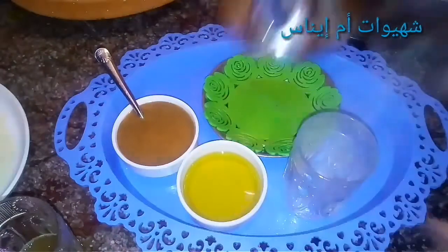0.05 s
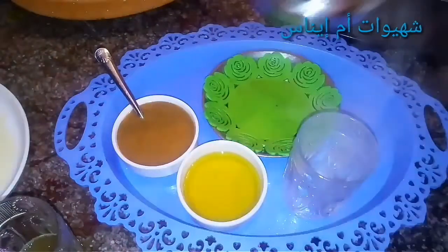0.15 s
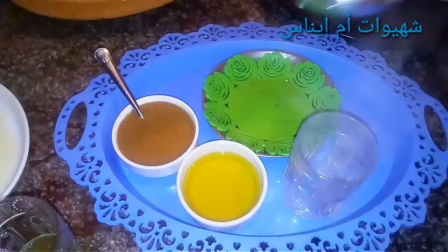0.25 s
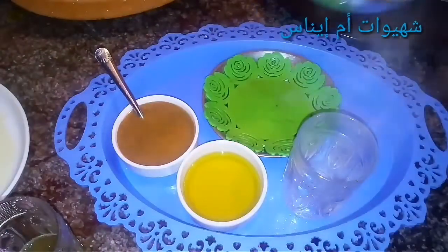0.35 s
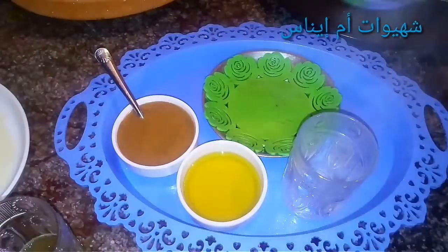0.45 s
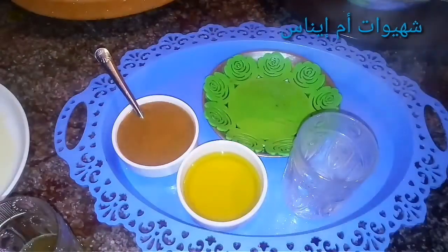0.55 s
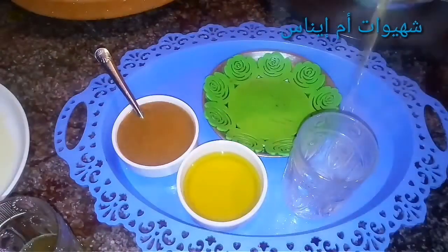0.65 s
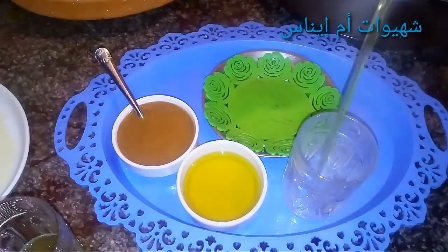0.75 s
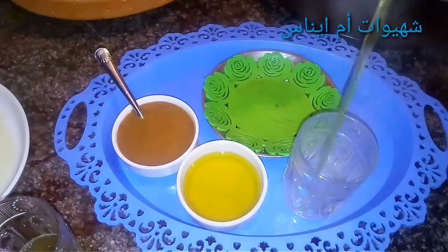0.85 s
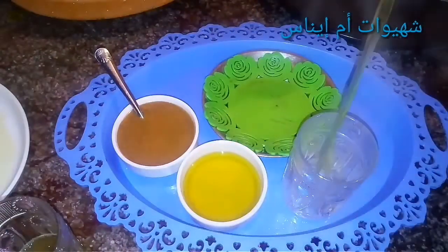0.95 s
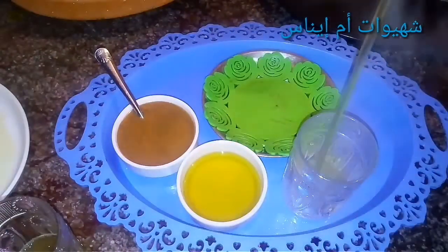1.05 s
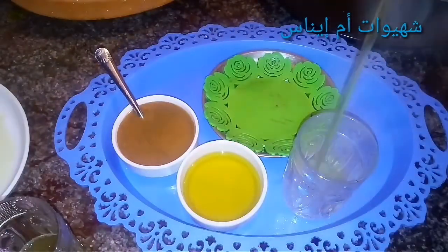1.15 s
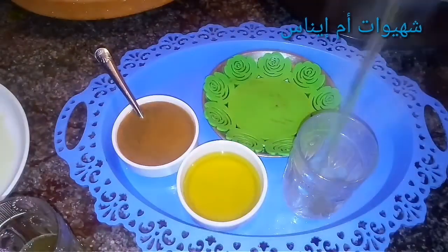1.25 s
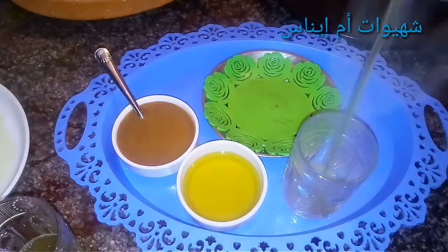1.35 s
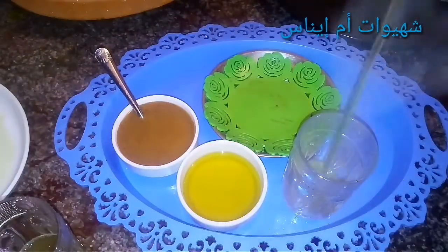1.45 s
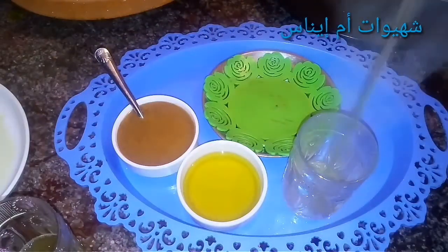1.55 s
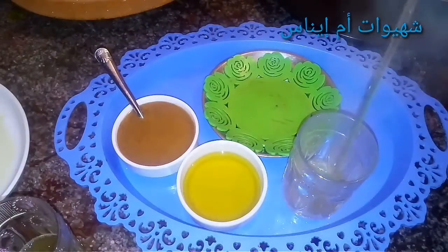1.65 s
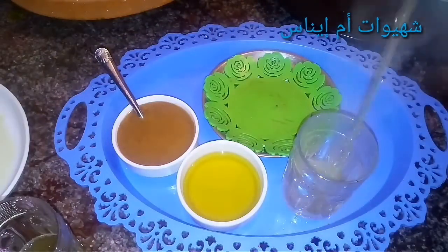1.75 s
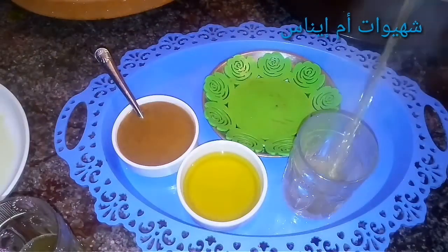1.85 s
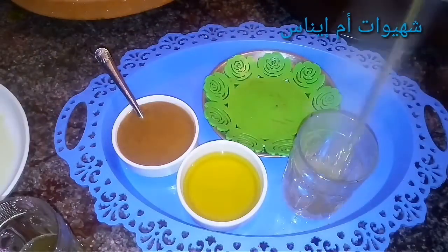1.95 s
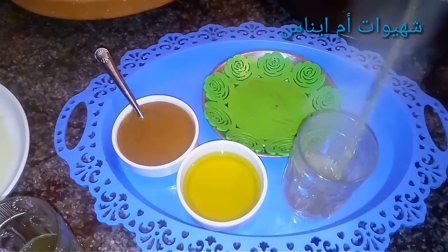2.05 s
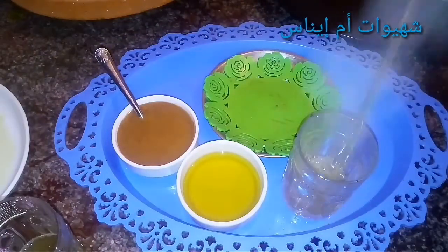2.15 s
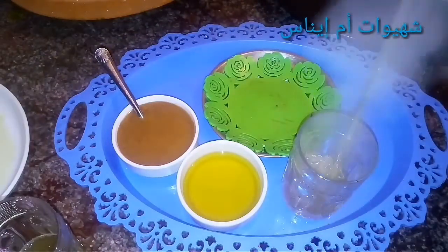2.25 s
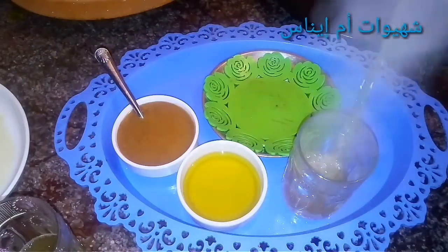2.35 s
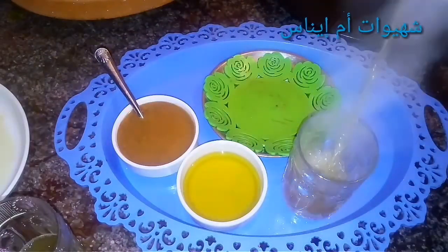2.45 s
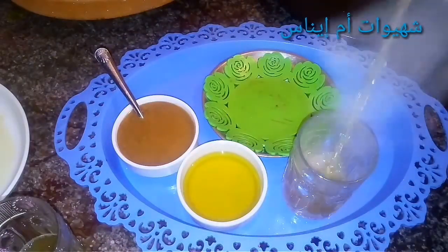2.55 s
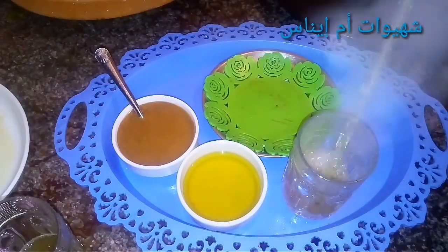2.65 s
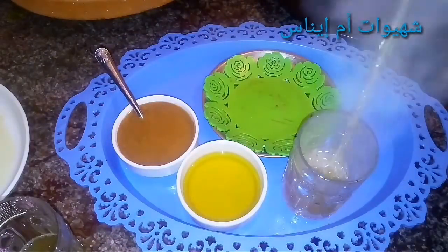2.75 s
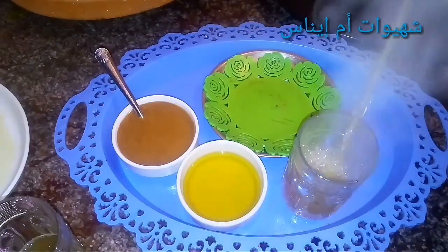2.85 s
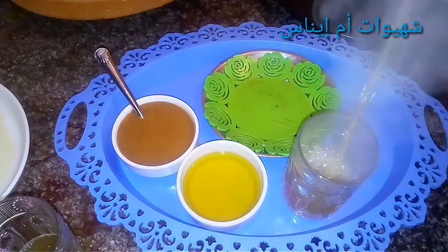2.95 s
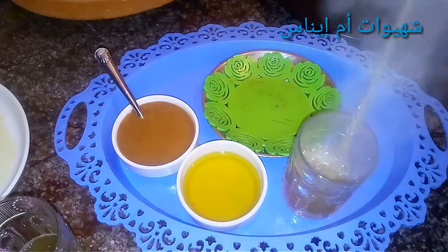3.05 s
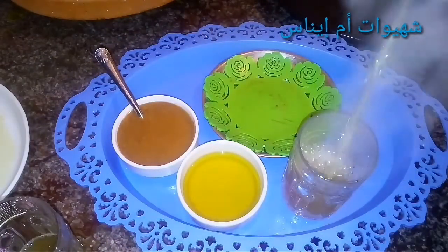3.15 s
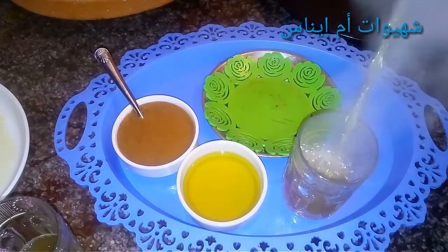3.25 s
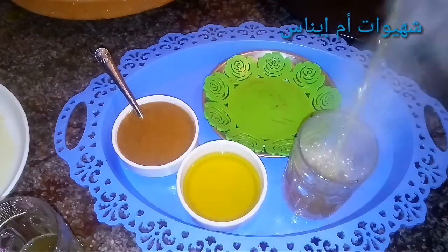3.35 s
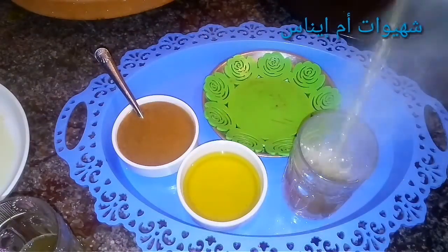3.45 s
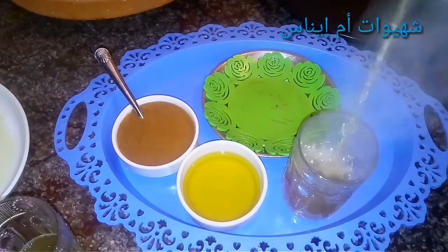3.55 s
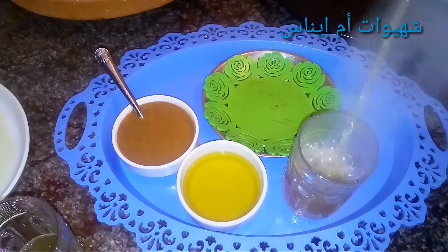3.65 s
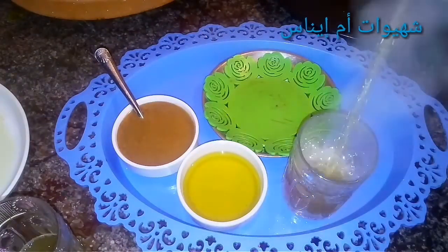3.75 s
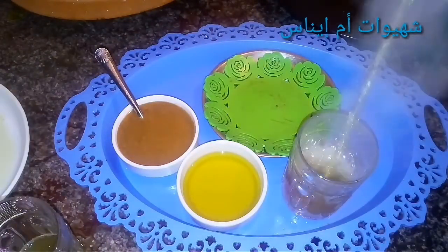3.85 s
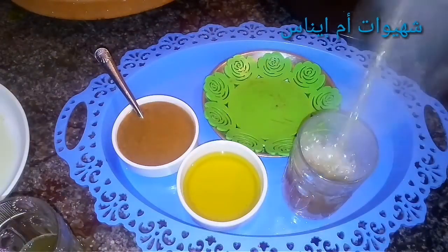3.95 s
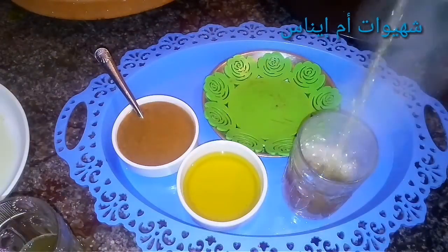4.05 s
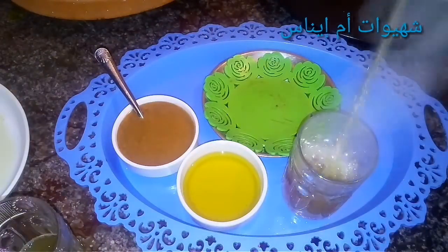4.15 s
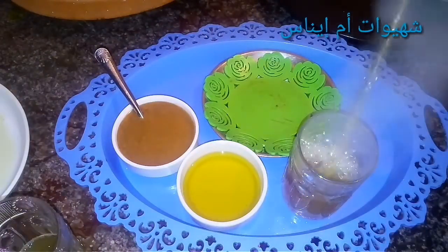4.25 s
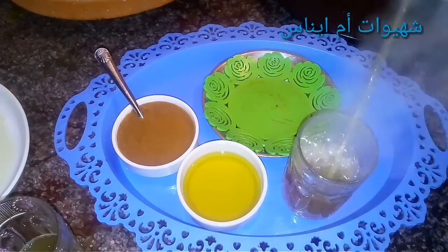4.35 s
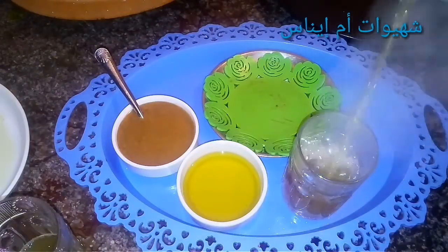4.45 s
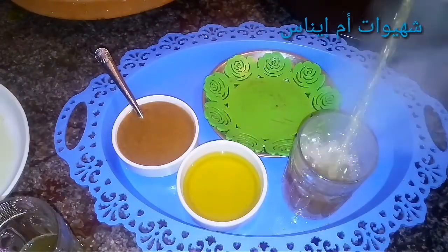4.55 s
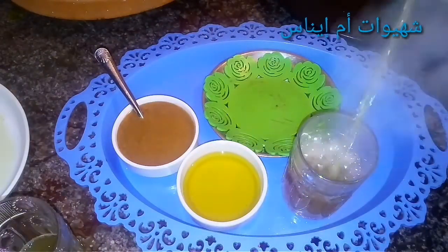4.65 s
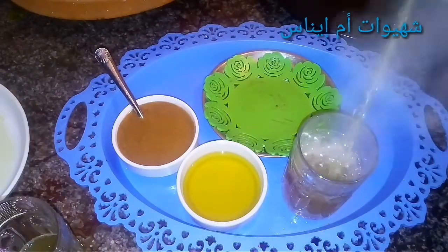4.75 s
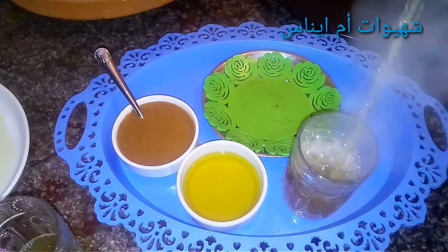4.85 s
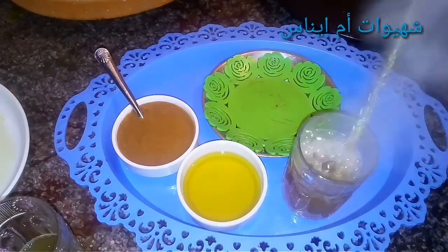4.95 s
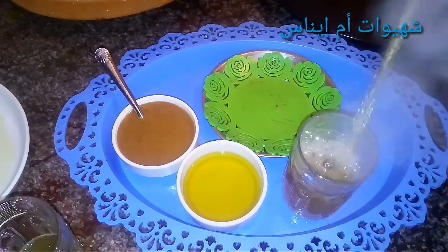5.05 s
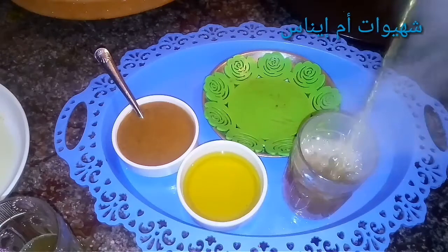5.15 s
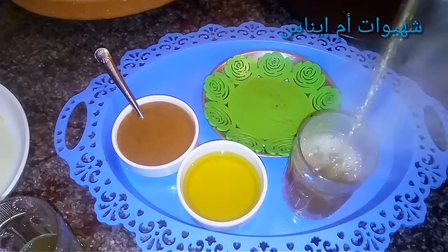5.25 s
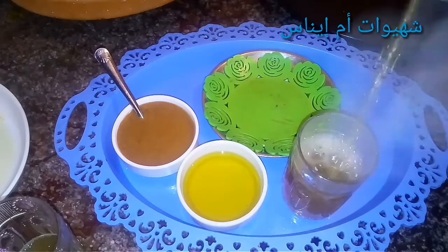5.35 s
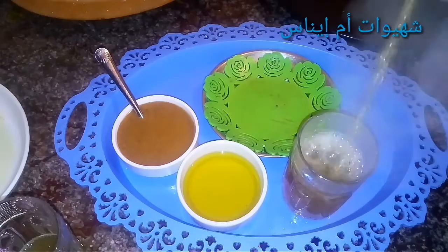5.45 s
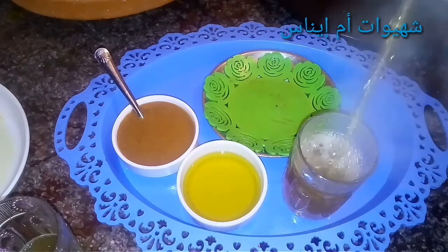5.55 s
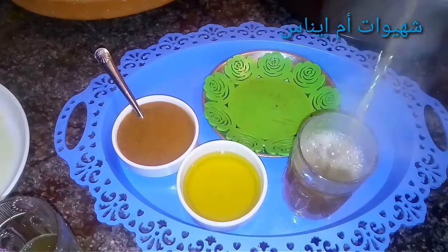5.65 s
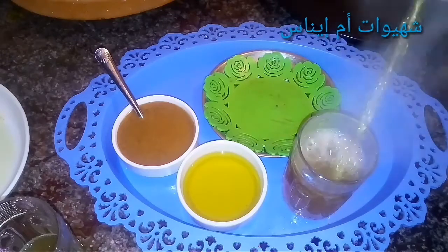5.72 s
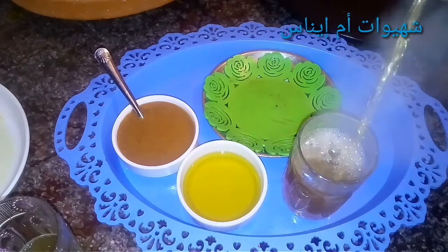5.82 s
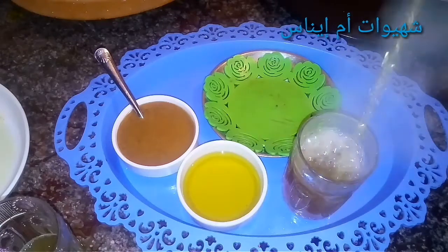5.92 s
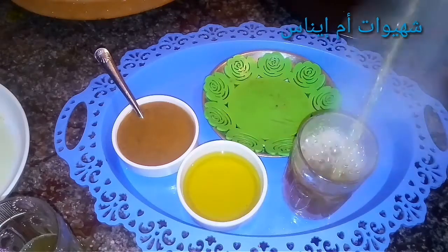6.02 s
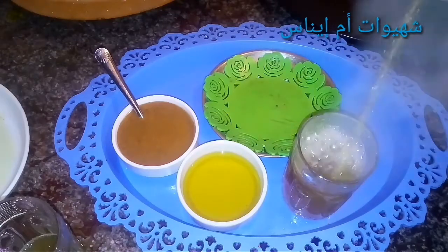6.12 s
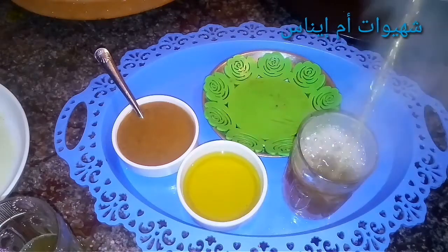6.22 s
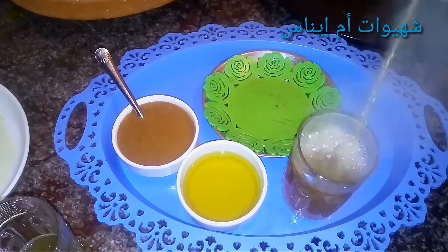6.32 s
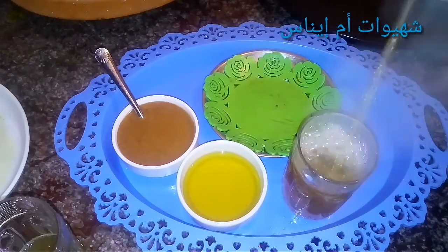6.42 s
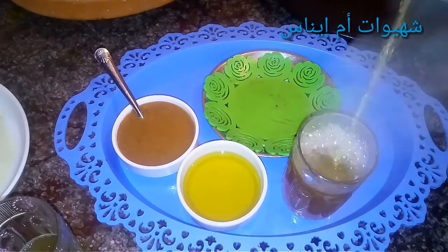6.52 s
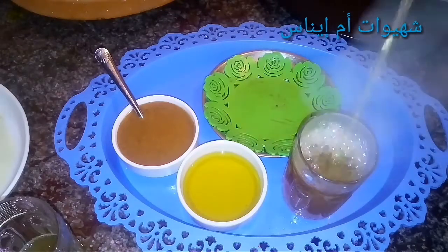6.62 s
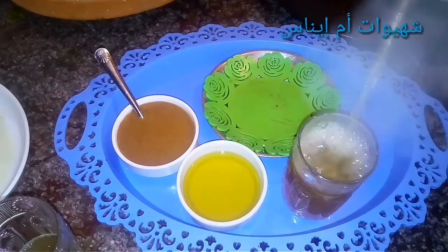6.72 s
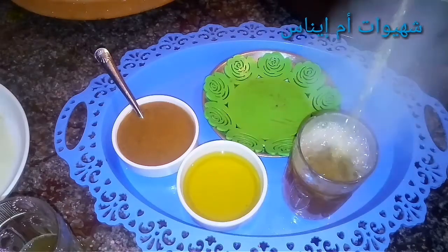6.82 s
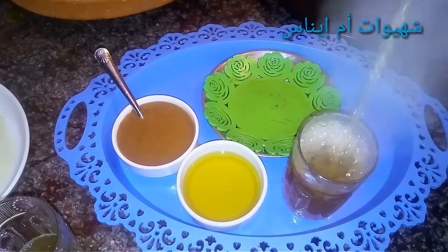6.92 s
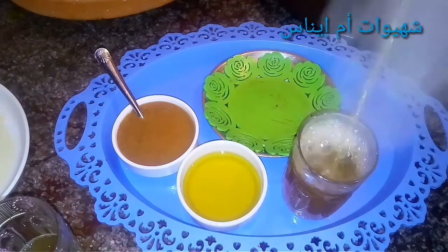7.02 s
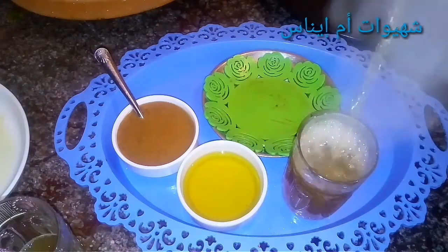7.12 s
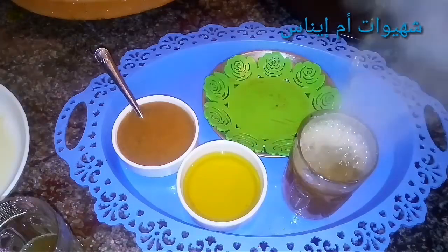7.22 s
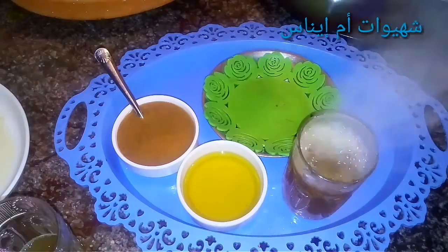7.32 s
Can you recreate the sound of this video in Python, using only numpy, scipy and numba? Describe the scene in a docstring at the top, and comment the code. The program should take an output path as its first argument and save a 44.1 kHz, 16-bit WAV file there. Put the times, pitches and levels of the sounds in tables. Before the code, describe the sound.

After a moment of quiet room noise and one light glass clink, tea starts pouring from a pot held high into a drinking glass. The first drops patter in the empty glass, then the steady stream splashes, spits and bubbles. The bubbling rises in pitch as the glass fills, with lower gulps beneath. The microphone is close, in a quiet room with a faint hum.

```python
"""Tea poured from a pot held high into a glass on a tray, taken close on a phone microphone in a quiet room.
The broken stream slaps the surface and spits spray, bubbles ring near the pitch of the shrinking air
column, and big air pockets gulp lower as the tea deepens. Tray, table and walls send the pour back.
Behind it lie room noise, house rumble, mains hum and faint tones, with one light clink before the pour."""
import sys
import numpy as np
from scipy import signal
from scipy.fft import rfft, irfft
from scipy.io import wavfile
from scipy.ndimage import uniform_filter1d
from numba import njit

SR = 44100
rng = np.random.default_rng(int(sys.argv[2]) if len(sys.argv) > 2 else 0)


def waveform_to_disk(signal):
    """Save audio, clipped to [-1, 1], as 16-bit WAV at the path in sys.argv[1]."""
    frames = np.transpose(np.atleast_2d(signal))
    scaled = np.clip(frames, -1, 1) * 32767
    samples = np.round(scaled).astype(np.int16)
    wavfile.write(sys.argv[1], SR, samples)


N = 325458

# spectrum of the room tone: (frequency [Hz], relative level [dB])
ROOM_SPECTRUM = [(25, -12), (60, -14.5), (140, -1.5), (240, -21.5), (330, -6.5), (520, -16.5), (700, -21.5),
                 (1400, -23.5), (3600, -27.5), (4000, -22.5), (4600, -24), (5050, -18.5), (6000, -35),
                 (9000, -38), (16000, -44)]
# room tone over time: (time [s], hiss level [dB], muffled stirring level [dB])
ROOM_LEVELS = [(0.0, -57.5, -61), (0.12, -61, -65), (0.2, -59, -62.5), (0.63, -63, -68), (1.1, -62, -72.5)]
# low rumble of the house: (time [s], level [dB])
HOUSE_RUMBLE = [(0.0, -55.5), (1.05, -64), (1.87, -58), (3.2, -64), (3.7, -76), (5.1, -60), (6.15, -77),
                (7.38, -83)]
# swells of the mains hum: (time [s], length [s], boost [dB])
MAINS_SWELLS = [(1.3, 0.168, 3.5), (1.949, 0.22, 7.5), (3.78, 0.68, 5.5), (5.23, 0.33, 13.5),
                (6.25, 0.31, 11)]
# thin wavering tones in the room: (frequency [Hz], level [dB])
THIN_TONES = [(2797, -77.5), (2847, -81), (4022, -86.5), (4318, -81.5)]
# brief blurred tones in the room: (time [s], length [s], pitch [Hz], level [dB])
BLURRED_TONES = [(0.12, 0.3, 477, -56.5), (0.613, 0.36, 508, -68.5), (1.39, 0.13, 426, -55.5)]
# glass ringing after a light knock: (frequency [Hz], level [dB], time to fall 60 dB [s])
CLINK_MODES = [(4930, -65.5, 1.7), (6600, -49, 0.068), (3230, -59, 0.19)]
# near reflections off tray and table: (delay [ms], gain [dB])
REFLECTIONS = [(2.2, -37), (3.6, -33), (5.2, -22.5), (10.2, -20)]
# response of the phone microphone: (frequency [Hz], gain [dB])
MIC_RESPONSE = [(20, -11.5), (40, -3), (4300, 0), (4950, 0), (5500, -0.5), (6300, -2), (7600, -17.5),
                (10000, -28.5), (13000, -33), (15500, -32)]
# how glass, tray and table colour the pour on its way out: (frequency [Hz], gain [dB])
GLASS_RESPONSE = [(100, -8), (230, -13), (300, -5.5), (850, -2.5), (1050, -5), (1150, -0.5), (1650, 0.5),
                  (1760, -3.5), (2020, 1.5), (2230, -11), (2440, -0.5), (2750, -7.5), (3200, -0.5),
                  (5000, -2.5)]
# modes of the glass wall: (frequency [Hz], width [Hz])
GLASS_MODES = [(4830, 110), (5100, 120)]
# first drops into the empty glass: (time [s], level [dB])
OPENING_DROPS = [(1.174, -56.5), (1.335, -45.5), (1.4, -56), (1.49, -52), (1.535, -64), (1.62, -55),
                 (1.665, -51)]
# strength of the stream at the glass: (time [s], splash level [dB], spray level [dB])
STREAM_LEVELS = [(1.08, -108, -87), (1.14, -61, -57), (1.36, -54, -65), (1.54, -44.5, -51), (1.8, -44, -39),
                 (2.2, -42.5, -47), (2.7, -42.5, -41.5), (3.3, -42, -43.5), (3.8, -42.5, -43.5),
                 (4.21, -42.5, -40.5), (4.7, -42.5, -50.5), (5.07, -44, -43.5), (5.35, -39.5, -40),
                 (5.77, -45.5, -45.5), (6.1, -39.5, -48.5), (6.5, -45.5, -47), (6.91, -46, -39),
                 (7.38, -43.5, -45)]
# colour of the small splashes: (frequency [Hz], relative gain [dB])
SPLASH_COLOUR = [(1200, 5.5), (2500, -1), (5000, 11.5), (6500, 5.5), (9000, 2.5)]
# thin spits of spray: (time [s], level [dB], pitch [Hz])
SPRAY_SPITS = [(1.516, -52, 9330), (1.6633, -50, 15000), (1.677, -43.5, 10200), (1.867, -49, 9900),
               (1.9987, -42.5, 9080), (2.1594, -43, 8730), (2.21, -45, 8900), (2.5558, -40.5, 8550),
               (2.7055, -56, 8730), (2.739, -41.5, 9250), (2.8048, -53, 9900), (2.834, -45, 9700),
               (2.8755, -50, 9110), (3.1929, -55, 8510), (3.489, -48, 8830), (3.693, -42.5, 8520),
               (4.221, -38, 8940), (4.284, -43, 8610), (4.3246, -49, 8630), (4.456, -48, 8550),
               (4.474, -44, 10100), (4.543, -42, 9160), (4.857, -36, 8550), (5.013, -44.5, 9160),
               (5.2721, -54, 8560), (5.8624, -50, 9120), (6.4603, -56, 10600), (6.475, -43.5, 9400),
               (6.5007, -38.5, 9130), (6.7053, -43, 8600), (6.764, -46, 8550), (6.804, -44, 8730),
               (6.8366, -47, 9210), (6.9387, -47, 9100), (7.3507, -50, 8900)]
# large air pockets: (time [s], level [dB], pitch [Hz])
POCKET_GULPS = [(2.3051, -32.5, 635), (2.3659, -34, 595), (2.4411, -33.0, 604), (2.4683, -35, 614),
                (2.5338, -30, 610), (2.6539, -34, 616), (2.7066, -35.5, 393), (2.83, -26, 755),
                (2.8758, -31.5, 443), (2.8955, -35, 423), (3.2099, -32, 624), (3.2391, -30, 471),
                (3.2566, -33, 410), (3.2723, -28.5, 436), (3.2845, -32, 400), (3.3159, -35, 422),
                (3.3292, -29, 640), (3.3971, -31.5, 410), (3.4688, -31, 503), (3.5973, -34, 373),
                (3.7324, -31, 620), (3.7569, -33, 287), (3.8831, -34, 614), (3.9827, -30, 327),
                (4.0197, -31.5, 610), (4.1032, -31.5, 435), (4.2466, -30, 422), (4.2847, -34.0, 590),
                (4.3928, -34.0, 390), (4.7605, -38.5, 360), (4.8506, -27.5, 382), (5.0649, -30.5, 303),
                (5.1302, -38, 430), (5.2816, -38, 392), (5.5125, -31, 410), (5.5745, -33, 360),
                (5.6909, -29, 350), (5.7163, -31, 357), (5.847, -27.5, 335), (5.9247, -31, 353),
                (6.1868, -36.5, 400), (6.302, -32.5, 377), (6.4166, -40.5, 388), (6.5463, -30.5, 400),
                (6.5659, -33, 300), (6.7028, -37.5, 347), (6.7634, -35, 377), (7.0024, -30, 395),
                (7.1442, -32, 395), (7.242, -36, 337)]
# bubbles ringing near the pitch of the air column: (time [s], level [dB], pitch [Hz])
BUBBLE_PINGS = [(1.2497, -36, 1890), (1.3328, -38, 2000), (1.368, -45, 1056), (1.381, -45, 1050),
                (1.3916, -36, 1960), (1.4973, -41, 1210), (1.535, -32.5, 1500), (1.5414, -37, 2020),
                (1.5875, -35.5, 1940), (1.5958, -33, 1940), (1.6016, -44, 2406), (1.6243, -41, 1470),
                (1.6475, -33, 1320), (1.6643, -32, 1180), (1.6698, -40, 1090), (1.714, -34, 1500),
                (1.7233, -31, 1145), (1.7289, -37, 1130), (1.7545, -30.5, 1140), (1.7798, -31, 1260),
                (1.7894, -31, 1157), (1.7964, -41, 1420), (1.8215, -30.5, 1920), (1.8511, -37, 1220),
                (1.855, -43, 1122), (1.9522, -32, 1210), (1.991, -29, 1160), (1.9984, -29.5, 1090),
                (2.1145, -29, 1180), (2.1337, -30, 1300), (2.1712, -25.5, 1210), (2.2522, -27.5, 1250),
                (2.2586, -26, 1570), (2.3065, -19.5, 1400), (2.3354, -31, 1670), (2.34, -32, 1090),
                (2.3599, -30, 1380), (2.3896, -28, 1300), (2.4427, -19.5, 1150), (2.5977, -28, 1220),
                (2.7616, -19.5, 1270), (2.7677, -23, 1230), (2.78, -39, 1270), (2.7989, -29, 1360),
                (2.831, -19, 1280), (2.8502, -25, 1200), (3.1798, -25.5, 1220), (3.2114, -23.5, 1290),
                (3.2551, -24, 1370), (3.3041, -25, 1240), (3.3307, -25.5, 1450), (3.3474, -25.0, 1340),
                (3.4345, -23.5, 1300), (3.444, -25, 1360), (3.4647, -36, 1330), (3.4775, -23, 1370),
                (3.5249, -19.5, 1380), (3.5377, -20, 1420), (3.5557, -19, 1420), (3.6102, -26.5, 1370),
                (3.633, -27, 1470), (3.6574, -19.5, 1430), (3.6958, -25, 1450), (3.7039, -11.5, 1340),
                (3.708, -36, 1280), (3.8062, -18, 1580), (3.8161, -25, 1310), (3.8995, -27, 1640),
                (3.9834, -17.5, 1440), (4.02, -20, 1320), (4.0523, -18, 1460), (4.1047, -22, 1440),
                (4.115, -29, 1480), (4.1468, -21, 1470), (4.186, -24, 1430), (4.2045, -22, 1320),
                (4.2104, -29, 1460), (4.2483, -18, 1410), (4.263, -25, 1440), (4.2682, -27, 1230),
                (4.2852, -19.5, 1450), (4.3113, -22, 1390), (4.3548, -20, 1510), (4.4545, -19, 1390),
                (4.494, -25, 1430), (4.5244, -24, 1460), (4.544, -27, 1380), (4.5868, -25, 1430),
                (4.599, -24.5, 1470), (4.6153, -25, 1460), (4.6646, -20.5, 1480), (4.751, -21, 1380),
                (4.8601, -22.5, 1530), (4.9226, -24, 1450), (4.9286, -20, 1560), (4.9344, -34, 1330),
                (4.9537, -28, 1466), (4.9895, -17.0, 1540), (4.9963, -17.5, 1920), (5.0655, -19.5, 1630),
                (5.085, -28, 1510), (5.1477, -21, 1560), (5.1697, -24.5, 1593), (5.2516, -21.5, 1590),
                (5.2821, -21, 1480), (5.3343, -23, 1470), (5.3761, -17, 1550), (5.3948, -26, 1530),
                (5.4144, -25.0, 1470), (5.4752, -26.0, 1440), (5.4892, -20.5, 1490), (5.5134, -17.5, 1815),
                (5.5675, -21, 1600), (5.5755, -19, 1610), (5.6069, -16.5, 1880), (5.6195, -22, 1560),
                (5.6305, -31, 1580), (5.645, -21.5, 1580), (5.7383, -23, 1700), (5.7513, -27, 1430),
                (5.7646, -17.5, 1680), (5.8002, -26, 1920), (5.8212, -33, 1450), (5.8435, -28, 1600),
                (5.8478, -20.5, 1600), (5.8916, -22, 1900), (5.9045, -24, 1950), (5.9252, -28.0, 1840),
                (5.9557, -24, 1900), (5.9828, -22, 1920), (5.9994, -26.5, 1580), (6.031, -30.5, 1796),
                (6.1258, -27, 1550), (6.1504, -26.5, 1580), (6.1805, -32, 1470), (6.224, -27.5, 1520),
                (6.249, -21, 1970), (6.2532, -27.5, 1860), (6.2758, -24.5, 1200), (6.302, -24, 1550),
                (6.3066, -28, 1600), (6.3165, -35, 1660), (6.4179, -22.5, 2010), (6.5467, -24, 1360),
                (6.642, -26, 1970), (6.704, -31.5, 1860), (6.7643, -23.0, 1840), (6.7837, -32, 1700),
                (6.8052, -24, 1990), (6.837, -14, 2000), (6.842, -29, 2070), (6.8572, -29, 1390),
                (6.9953, -21.5, 1890), (7.0031, -31, 1370), (7.0355, -21, 1485), (7.0603, -18, 1470),
                (7.0645, -31, 1520), (7.0912, -28, 1420), (7.1359, -21, 1860), (7.142, -36, 1890),
                (7.157, -30, 1520), (7.24, -23.5, 1490), (7.2672, -18.5, 1610), (7.328, -21, 2060)]
# loud slaps of the stream: (time [s], level [dB], pitch [Hz])
STREAM_SLAPS = [(1.1656, -39, 4650), (1.1743, -35.5, 5530), (1.2208, -30.5, 5060), (1.2254, -37, 4680),
                (1.242, -40, 4880), (1.2454, -35, 5040), (1.2491, -41, 5700), (1.2658, -42, 2900),
                (1.3227, -44, 3360), (1.3288, -32, 2900), (1.3329, -42, 4900), (1.3918, -32, 3260),
                (1.4027, -30.5, 5140), (1.4582, -36, 4900), (1.4901, -23.5, 5000), (1.4951, -34, 5170),
                (1.5038, -34, 5070), (1.5169, -33, 3570), (1.5385, -27, 4870), (1.5934, -26, 3410),
                (1.6025, -14.5, 3350), (1.624, -21.5, 4800), (1.6463, -19.5, 4930), (1.6775, -9.5, 4900),
                (1.681, -18, 4830), (1.7948, -14.5, 4960), (1.8, -19.5, 4820), (1.8373, -21.5, 4940),
                (1.8435, -26, 3370), (1.8678, -16, 3900), (1.8906, -19.5, 5300), (1.9086, -16.5, 4130),
                (1.9126, -26, 3700), (1.9301, -23, 3760), (1.9512, -17.5, 5400), (1.9914, -24, 4940),
                (2.0009, -9.5, 4740), (2.0807, -22.5, 4520), (2.1062, -23, 4900), (2.1333, -22, 3380),
                (2.146, -20.5, 4830), (2.1585, -15.5, 3940), (2.162, -17.5, 5000), (2.2099, -20.5, 4800),
                (2.3576, -22.5, 3230), (2.3657, -19, 4020), (2.4196, -21, 4200), (2.4936, -26, 4570),
                (2.5634, -12, 4040), (2.6558, -19.5, 4600), (2.7329, -28.5, 3710), (2.7377, -17.5, 4020),
                (2.8188, -21.5, 4000), (2.8337, -19.5, 3950), (2.8763, -28, 4000), (2.9183, -16, 4270),
                (2.9461, -17.5, 4550), (3.0963, -15, 4300), (3.1065, -15.5, 4260), (3.1943, -11.5, 4300),
                (3.2113, -30, 4610), (3.2968, -19.5, 4400), (3.3507, -25, 4800), (3.354, -18.5, 4300),
                (3.4402, -25, 4330), (3.4904, -18.5, 4540), (3.5249, -22.5, 4350), (3.597, -18.5, 4240),
                (3.6792, -19, 3420), (3.6947, -14.5, 4250), (3.7478, -18.5, 5000), (3.7692, -21.5, 4470),
                (3.8141, -7.5, 4730), (3.8173, -11, 3170), (3.8246, -19.5, 4670), (3.8869, -19.5, 4600),
                (3.906, -26, 4850), (3.9148, -15.5, 4100), (4.002, -19.5, 3400), (4.0204, -25, 2820),
                (4.0519, -21, 4450), (4.0574, -25, 4810), (4.082, -25, 3280), (4.248, -26, 4930),
                (4.285, -18.5, 4290), (4.311, -22, 4380), (4.348, -21, 4630), (4.5701, -20, 3440),
                (4.7377, -23, 4500), (4.8481, -22, 4670), (4.8587, -21, 4700), (4.9284, -22.5, 3510),
                (4.9366, -21, 4180), (5.0975, -21.5, 3630), (5.247, -28, 3800), (5.2837, -13, 4400),
                (5.363, -19.5, 4900), (5.3783, -25, 5100), (5.3946, -21, 3600), (5.4364, -11, 4300),
                (5.4395, -29, 4100), (5.4471, -21, 4150), (5.4632, -22, 5560), (5.6198, -19, 5400),
                (5.6451, -21, 5560), (5.7641, -15.5, 4550), (5.8004, -14, 4400), (5.8208, -21.5, 4940),
                (5.8425, -21.5, 4570), (5.9811, -20, 4800), (6.064, -27, 3560), (6.1255, -22, 4940),
                (6.1506, -19, 5150), (6.2466, -21, 5270), (6.3025, -24, 3970), (6.3109, -18, 5100),
                (6.5024, -15, 4830), (6.5355, -23, 4280), (6.5841, -19, 4900), (6.6422, -20, 5070),
                (6.7643, -22.5, 5030), (6.8372, -14.5, 2480), (6.8569, -18.5, 4600), (6.8675, -20, 3540),
                (6.8887, -17, 4900), (6.9177, -20.5, 3200), (6.939, -18, 5350), (6.9511, -15, 4460),
                (7.018, -20.5, 5100), (7.136, -19.5, 5000), (7.1573, -13, 4400), (7.1678, -24, 4760),
                (7.2399, -24.5, 3540), (7.2592, -18.5, 4900), (7.2773, -21, 3200), (7.3527, -20.5, 5000),
                (7.3631, -23.5, 3530)]

POOL_S, FOAM_S = 1.96, 3.3  # the tea is deep enough to swallow air; foam starts to form
FILL_FROM_S, FILL_TO_S = 1.9, 5.68
TIME = np.arange(N) / SR
FILL = np.clip((TIME - FILL_FROM_S) / (FILL_TO_S - FILL_FROM_S), 0, 1)  # 0 empty, 1 full
STEADY = np.ones(N)


def undb(db):
    """dB to gain."""
    return 10 ** (np.asarray(db) / 20)


def unit(x):
    """Scale to rms 1."""
    return x / np.sqrt(np.mean(x ** 2))


def curves(table):
    """The columns after time, as sample curves."""
    s, *columns = np.transpose(table)
    return [np.interp(TIME, s, column) for column in columns]


def gate(start_s, length_s, edge_s):
    """0 to 1 over edge_s, held, back to 0."""
    age = TIME - start_s
    return np.clip(np.minimum(age, length_s - age) / edge_s, 0, 1)


def wander(rate):
    """Smooth random drift, about `rate` turns a second; rms 1."""
    hold = int(SR / rate)
    steps = np.repeat(rng.standard_normal(N // hold + 1), hold)
    return unit(uniform_filter1d(steps, hold)[:N])


def noise_band(hz, width):
    """Noise through one resonance, `width` Hz wide; rms 1."""
    return unit(signal.lfilter(*signal.iirpeak(hz, hz / width, fs=SR), rng.standard_normal(N)))


def colour(x, table):
    """Causal filter with the (Hz, dB) shape, built from the folded cepstrum."""
    hz, db = np.transpose(table)
    size = 4096
    log_hz = np.log(np.arange(size + 1) * SR / 2 / size + 1)
    cepstrum = irfft(np.interp(log_hz, np.log(hz), db) * np.log(10) / 20)
    cepstrum[1:size] *= 2
    cepstrum[size + 1:] = 0
    impulse = irfft(np.exp(rfft(cepstrum)))[:size]
    return signal.fftconvolve(x, impulse)[:N]


@njit
def resonate(x, hz, width):
    """Band-pass whose centre and width in Hz follow sample curves."""
    out, band, low = np.empty(len(x)), 0., 0.
    for i in range(len(x)):
        g, damping = np.tan(np.pi * hz[i] / SR), width[i] / hz[i]
        v = (band + g * (x[i] - low)) / (1 + g * (g + damping))
        band, low = 2 * v - band, low + 2 * g * v
        out[i] = damping * v
    return out


@njit
def grains(start, hz, gain, cycles, rise, glide):
    """Sines that swell over `rise` cycles, die over `cycles` and glide up like a surfacing bubble."""
    out = np.zeros(N)
    for k in range(len(start)):
        period = SR / hz[k]
        fall, swell = np.exp(-1 / (cycles[k] * period)), np.exp(-1 / (rise * period))
        decay, onset, phase, step = 1., 1., 0., 2 * np.pi / period
        for i in range(start[k], min(N, start[k] + int(6 * cycles[k] * period))):
            out[i] += gain[k] * decay * (1 - onset) * np.sin(phase)
            decay, onset, phase = decay * fall, onset * swell, phase + step
            step *= 1 + glide / period
    return out


def accents(table, cycles, rise, glide, early_ms, lead_ms, lead_db):
    """A loud grain for each row, led by another as the drop first touches."""
    s, db, hz = np.transpose(table)
    # allow for what glass, microphone and the grain's own swell take off its peak
    responses = np.transpose(GLASS_RESPONSE), np.transpose(MIC_RESPONSE)
    path_db = sum(np.interp(np.log(hz), np.log(freqs), gains) for freqs, gains in responses)
    gain = undb(db - path_db) * (1 + cycles / rise) ** (rise / cycles) * (1 + rise / cycles)
    start = ((s - early_ms / 1000) * SR).astype(np.int64)
    gap, detune = rng.random((2, len(s)))
    lead_start = start - (lead_ms * (0.452 + gap) * SR / 1000).astype(np.int64)
    decays = np.full(len(s), cycles)
    leads = grains(lead_start, hz * (0.87 + 0.5 * detune), gain * undb(lead_db), decays, rise, glide)
    return grains(start, hz, gain, decays, rise, glide) + leads


def swarm(drops, centre_hz, spread, shared_db, own_db, top_db, cycles, rise, glide, bunch_s, per_drop,
          lowest=0.34):
    """Small grains bunched around each drop, their level part the drop's and part their own; rms 1."""
    when, drop_draw = drops.repeat(per_drop, axis=0).T
    own_draw, length = rng.random((2, len(when)))
    detune, scatter = rng.standard_normal((2, len(when)))
    start = np.clip(when * N + bunch_s * SR * scatter, 0, N - 1).astype(np.int64)
    db = np.minimum(-shared_db * np.log(drop_draw + 1e-9) - own_db * np.log(own_draw + 1e-9), top_db)
    hz = np.clip(centre_hz[start] * np.exp(spread * detune), centre_hz[start] * lowest, 17000)
    return unit(grains(start, hz, undb(db), cycles * (.5 + length), rise, glide))


def room_tone():
    """The quiet room: hiss, muffled stirring and the low rumble of the house."""
    hiss_db, stir_db = curves(ROOM_LEVELS)
    hiss = unit(colour(rng.standard_normal(N), ROOM_SPECTRUM)) * undb(hiss_db)
    stirring = noise_band(357, 230) * undb(stir_db)
    rumble = noise_band(45.8, 6.1) * undb(curves(HOUSE_RUMBLE)[0])
    return hiss + stirring + rumble


def mains_hum(hz=98.8, width=3.7, fade_db_per_s=0.5):
    """Mains hum and its octave, swelling now and then as it slowly fades."""
    swell_db = sum(db * gate(s, length, edge_s=0.038) for s, length, db in MAINS_SWELLS)
    hum = noise_band(hz, width) + undb(-6.5) * noise_band(2 * hz, 2 * width)
    return hum * undb(-61.5 - fade_db_per_s * TIME + swell_db)


def faint_tones(waver_db=2.5):
    """Thin high whines that waver in level, and a few brief blurred tones lower down."""
    whines = sum(undb(db + waver_db * wander(12)) * np.sqrt(2) * np.sin(2 * np.pi * hz * TIME)
                 for hz, db in THIN_TONES)
    blurred = sum(undb(db) * gate(s, length, edge_s=0.085) * noise_band(hz, width=25)
                  for s, length, hz, db in BLURRED_TONES)
    return whines + blurred


def clink(at_s=0.489, attack_s=0.011, rustle_db_per_s=164.5):
    """A light knock that leaves glass ringing, with a short rustle."""
    age = np.maximum(TIME - at_s, 0)
    rustle = noise_band(2700, 5300) * np.minimum(age / attack_s, 1) * undb(-52.5 - rustle_db_per_s * age)
    glass_ring = sum(undb(db - 60 * age / t60) * np.sin(2 * np.pi * hz * age)
                     for hz, db, t60 in CLINK_MODES)
    return rustle + glass_ring


def echoes(x, walls_db=-12, t60_s=0.25, dull_hz=7450):
    """Direct sound, near reflections, then the diffuse tail of the walls, which swallow the treble."""
    t = np.arange(SR // 2) / SR
    tail = rng.standard_normal(len(t)) * undb(-60 * t / t60_s) * np.clip(t / 0.00058, 0, 1)
    tail = signal.lfilter(*signal.butter(2, dull_hz, fs=SR), tail)
    response = undb(walls_db) * tail / np.sqrt(np.sum(tail ** 2))
    response[0] = 1
    for ms, db in REFLECTIONS:
        response[int(ms * SR / 1000)] += undb(db)
    return signal.fftconvolve(x, response)[:N]


def pooled(start_s, rise_s, db, wander_db, foam_db_per_s):
    """Gain of a layer that comes in as the tea pools, drifts, and slopes up or down once foam forms."""
    foamed_s = np.maximum(TIME - FOAM_S, 0)
    level_db = db + wander_db * wander(11) + foam_db_per_s * foamed_s
    return gate(start_s, 2 * N / SR, rise_s) ** 2 * undb(level_db)


def empty_glass(hz=1002, attack_s=0.0043, fall_db_per_s=152):
    """The empty glass rings briefly under each of the first drops."""
    struck = sum(np.clip((TIME - s) / attack_s, 0, 1) * undb(db - fall_db_per_s * np.maximum(TIME - s, 0))
                 for s, db in OPENING_DROPS)
    return struck * noise_band(hz, width=30)


def glass(tea, body_hz=1170, body_width_hz=30):
    """Every drop rings the low mode and the wall of the glass; the rising tea damps both."""
    with_body = tea + undb(-5 - 8 * FILL) * resonate(tea, body_hz * STEADY, body_width_hz * STEADY)
    wall = sum(resonate(with_body, hz * STEADY, width * STEADY) for hz, width in GLASS_MODES)
    return colour(with_body + undb(-1.5 - 2 * FILL) * wall, GLASS_RESPONSE)


def air_column(drops, column_hz, empty_width_hz=95, full_width_hz=148):
    """The patter of drops rings the air above the tea; the resonance broadens as the glass fills."""
    width = empty_width_hz * (full_width_hz / empty_width_hz) ** FILL
    patter = swarm(drops, column_hz, spread=0.12, shared_db=6.5, own_db=3.0, top_db=19.5,
                   cycles=0.77, rise=0.15, glide=0.001, bunch_s=0.005, per_drop=4)
    # a narrow resonance passes less of the patter, so the width is divided out
    ringing = unit(resonate(patter, column_hz, width) / np.sqrt(width))
    return ringing * pooled(start_s=1.74, rise_s=0.17, db=-46.5, wander_db=0, foam_db_per_s=-8)


def sizzle(rise_s=0.012, decay_s=0.034):
    """Fine mist after each spit: high noise that dies away."""
    s, db, _ = np.transpose(SPRAY_SPITS)
    kicks = np.zeros(N)
    kicks[(s * SR).astype(int)] = undb(db + 1.5)
    fizz = signal.lfilter([1], [1, -np.exp(-1 / (decay_s * SR))], kicks)
    return uniform_filter1d(fizz, int(rise_s * SR) + 1) * noise_band(12800, 7000)


def spray(drops, level_db):
    """Tiny droplets spatter, under single spits that each also snap higher up."""
    droplets = swarm(drops, 11000 * STEADY, spread=0.32, shared_db=7.0, own_db=2.5, top_db=15.5,
                     cycles=1.6, rise=1.5, glide=0.0011, bunch_s=0.004, per_drop=16, lowest=0.6)
    overtones = [(s, db - 11.5, min(hz * 1.8, 15000.)) for s, db, hz in SPRAY_SPITS]
    spits = accents(list(SPRAY_SPITS) + overtones, cycles=1.2, rise=0.96, glide=0.0011,
                    early_ms=0.017, lead_ms=0.9, lead_db=5.5)
    return droplets * undb(level_db) + spits


def thuds(drops, hz=184):
    """Drops land in the pooled tea with a low thud."""
    low = swarm(drops, hz * STEADY, spread=0.2, shared_db=5.5, own_db=1.0, top_db=10.5,
                cycles=1.6, rise=0.37, glide=0.005, bunch_s=0.002967, per_drop=1)
    return low * pooled(POOL_S, rise_s=1.24, db=-47.5, wander_db=1.3, foam_db_per_s=-0.2)


def gulps(drops, shallow_hz=707, deep_hz=373.6):
    """Big pockets of swallowed air ring lower as the tea deepens."""
    hz = shallow_hz * (deep_hz / shallow_hz) ** FILL
    soft = swarm(drops, hz, spread=0.41, shared_db=7.5, own_db=1.5, top_db=8.0,
                 cycles=1.15, rise=0.43, glide=0.014, bunch_s=0.002025, per_drop=2, lowest=0.568)
    soft *= pooled(POOL_S, rise_s=0.078, db=-42, wander_db=1.47, foam_db_per_s=-0.54)
    return soft + accents(POCKET_GULPS, cycles=1.6, rise=0.19, glide=0.0043,
                          early_ms=2.36, lead_ms=6.7, lead_db=-24)


def bubbles(drops, column_hz):
    """Bubbles ring near the pitch of the air column; each loud ping opens with a short, higher snap."""
    soft = swarm(drops, column_hz, spread=0.24, shared_db=5.0, own_db=6.0, top_db=17.5,
                 cycles=1.7, rise=0.44, glide=0.0084, bunch_s=0.003, per_drop=2)
    soft *= pooled(start_s=1.5, rise_s=1.35, db=-45.5, wander_db=3, foam_db_per_s=0.4)
    pings = accents(BUBBLE_PINGS, cycles=1.55, rise=0.65, glide=0.0021,
                    early_ms=0.48, lead_ms=2.33, lead_db=-12.5)
    overtones = [(s, db - 15, hz * 1.89) for s, db, hz in BUBBLE_PINGS]
    snaps = accents(overtones, cycles=0.77, rise=0.3, glide=0.002,
                    early_ms=0.804, lead_ms=1.48, lead_db=-13)
    return soft + pings + snaps


def splashes(drops, level_db):
    """The stream hits the surface: loud slaps over small splashes and mist too fine to hear as drops."""
    small = swarm(drops, 4000 * STEADY, spread=0.472, shared_db=4.0, own_db=4.0, top_db=19.5,
                  cycles=2.06, rise=0.31, glide=0.0028, bunch_s=0.0013, per_drop=4)
    mist = undb(-11.5 + 1.5 * wander(30)) * noise_band(4600, 5000)
    slaps = accents(STREAM_SLAPS, cycles=1.82, rise=0.27, glide=0.0036,
                    early_ms=0.044, lead_ms=1.9, lead_db=-8.5)
    return unit(colour(small + mist, SPLASH_COLOUR)) * undb(level_db) + slaps


def pour(air_empty_m=0.0792, air_full_m=0.047):
    """The stream breaks into drops and fills the glass, so the air column shortens and rises in pitch."""
    splash_db, spray_db = curves(STREAM_LEVELS)
    air_m = air_empty_m + (air_full_m - air_empty_m) * FILL
    column_hz = 343 / 4 / air_m  # quarter-wave resonance
    drops = rng.random((2000, 2))  # each drop's moment and its draw for loudness
    spatters = drops[::3]  # one drop in three also spatters and thuds
    surface = splashes(drops, splash_db) + spray(spatters, spray_db) + sizzle()
    submerged = bubbles(drops, column_hz) + gulps(drops) + thuds(spatters)
    ringing = air_column(drops, column_hz) + empty_glass()
    return glass(surface + submerged + ringing)


def scene():
    """The pour close up with its echoes, the room behind it; mono."""
    return (echoes(pour()) + room_tone() + mains_hum() + faint_tones() + clink())[None]


def record(dry, hiss_db=-86, top_hz=15700):
    """The phone microphone dulls the spray above the splash band, adds its own hiss and cuts the top."""
    heard = colour(dry[0], MIC_RESPONSE) + undb(hiss_db) * rng.standard_normal(N)
    return signal.sosfilt(signal.ellip(8, .2, 70, top_hz, fs=SR, output="sos"), heard)[None]


dry = scene()
out = record(dry)
waveform_to_disk(out)
```